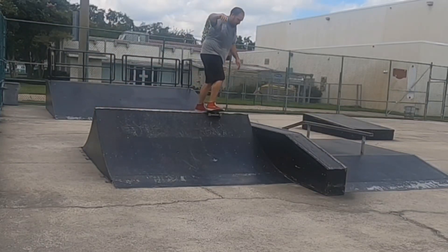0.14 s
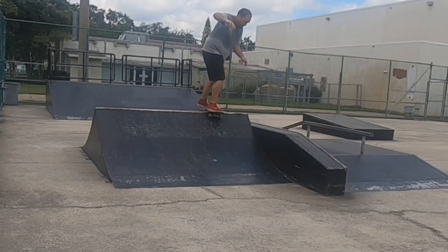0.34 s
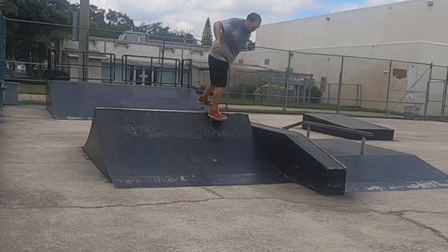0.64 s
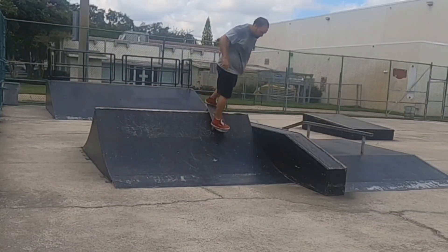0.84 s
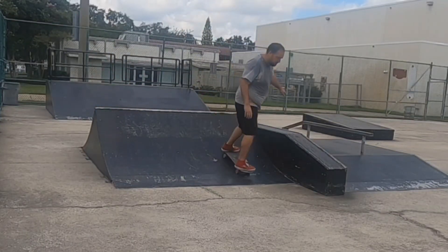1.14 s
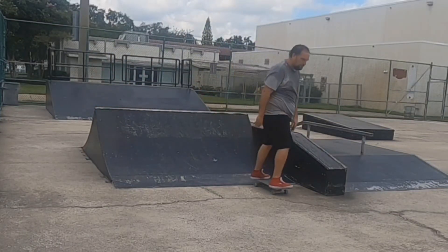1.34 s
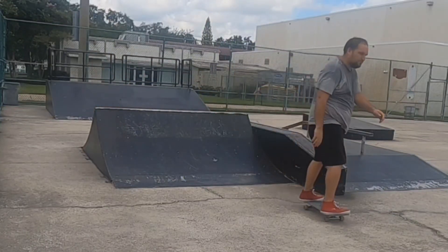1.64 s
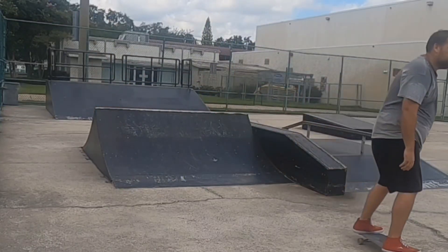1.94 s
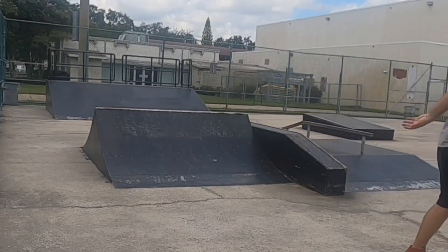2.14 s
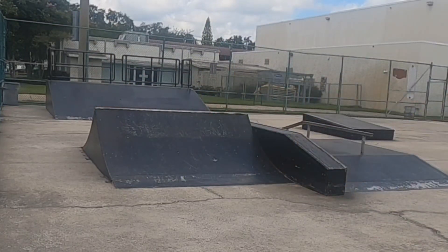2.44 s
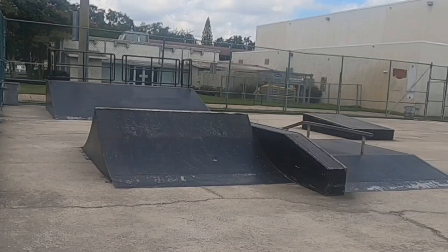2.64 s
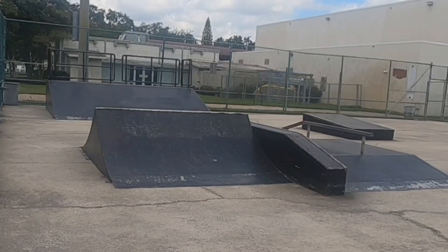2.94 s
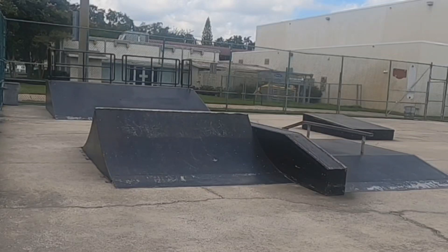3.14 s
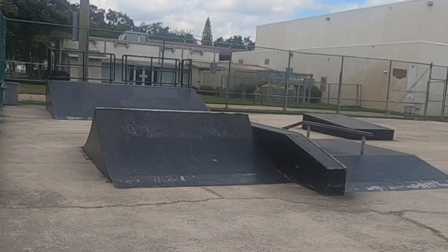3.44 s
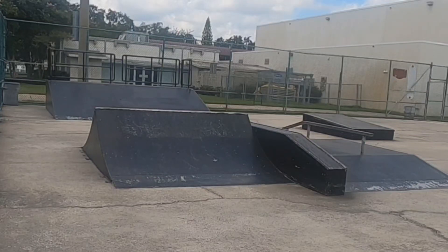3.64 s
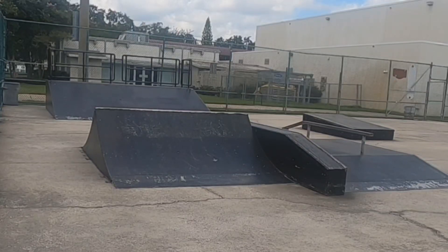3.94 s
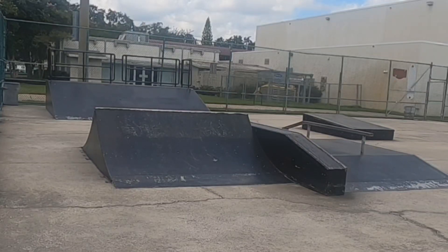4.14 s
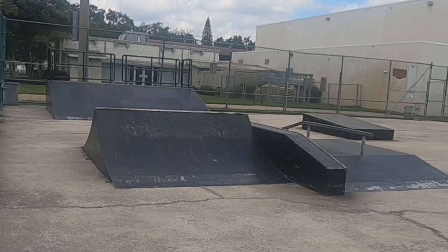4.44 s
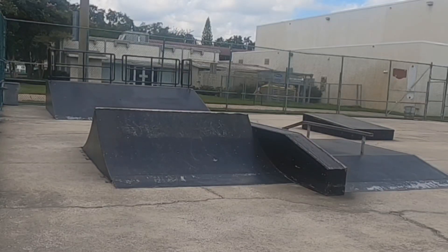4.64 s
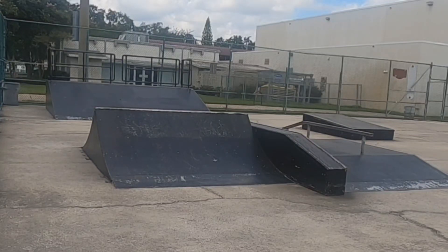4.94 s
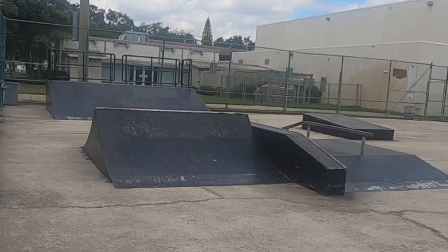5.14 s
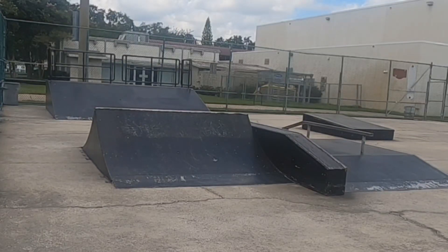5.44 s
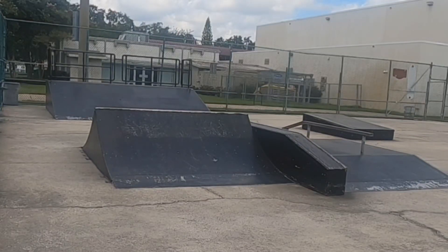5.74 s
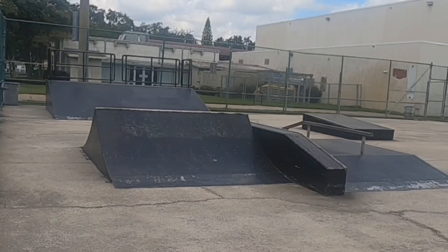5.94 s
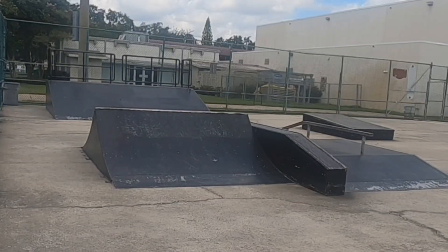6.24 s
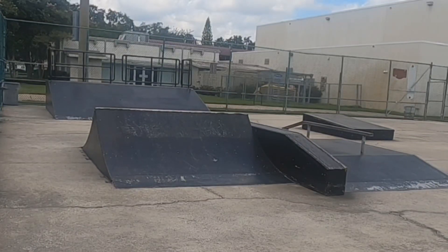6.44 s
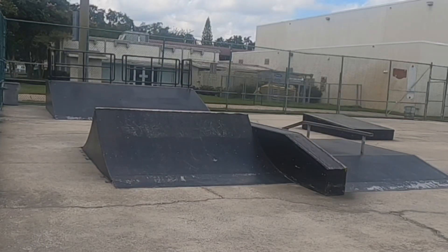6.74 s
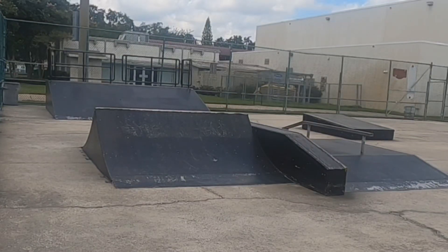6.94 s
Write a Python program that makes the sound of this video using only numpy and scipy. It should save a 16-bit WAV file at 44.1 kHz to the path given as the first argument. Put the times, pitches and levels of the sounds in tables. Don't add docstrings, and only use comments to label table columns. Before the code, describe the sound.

A small camera microphone outdoors catches a steady low hum of fan, motor and rushing air. Over it come brief wood knocks, then a burst of metallic clacks as a skateboard rolls down a ramp, a hollow gritty rumble approaching, scraping wheels, and two heavy deck blows at its closest. It leaves quickly with fading clicks; the wavering hum remains, with a very thin, high insect buzz.

```python
import sys
import numpy as np
from scipy import signal
from scipy.fft import rfft, irfft, next_fast_len
from scipy.io import wavfile
from scipy.ndimage import uniform_filter1d

SR = 44100
rng = np.random.default_rng(int(sys.argv[2]) if len(sys.argv) > 2 else 0)


def gain_from_db(level_db):
    decades = np.asarray(level_db, float) / 20
    return 10 ** decades


def generate_wav(signal):
    frames = np.transpose(np.atleast_2d(signal))
    scaled = np.clip(frames, -1, 1) * 32767
    pcm = np.round(scaled).astype(np.int16)
    wavfile.write(sys.argv[1], SR, pcm)


N = 313551
TIME = np.arange(N) / SR
SIZE = next_fast_len(N)
SHORT = np.arange(4096) / SR


def curves(table):
    s, *columns = np.transpose(table)
    return [np.interp(TIME, s, c) for c in columns]


def plateaus(events, attack_s, release_s=None):
    total = 0
    for s, db, hold, back in events:
        total = total + np.interp(TIME - s, np.cumsum([0, attack_s, hold, back]), [0, db, db, 0])
    return total


def unit(x):
    return x / np.sqrt(np.mean(x ** 2))


def peak(x):
    return x / np.max(abs(x), axis=1, keepdims=True)


def walk(rate):
    k = int(SR / rate)
    steps = np.repeat(rng.standard_normal(N // k + 1), k)
    return 1.14 * uniform_filter1d(uniform_filter1d(steps, k), k)[:N]


def ring(x, hz, width):
    return signal.lfilter(*signal.iirpeak(hz, hz / width, fs=SR), x)


def band(x, lo_hz, hi_hz, order=2):
    edges = [lo_hz, min(hi_hz, .45 * SR)]
    return signal.sosfilt(signal.butter(order, edges, "band", fs=SR, output="sos"), x)


def grains(rate, spread_db, count=N):
    on = rng.random(count) < rate / SR
    return on * gain_from_db(spread_db * rng.exponential(size=count)) * rng.standard_normal((2, count))


# (time [s], length [s], extra grit level [dB])
SCRAPES = [(1.062, 0.018, 1), (1.112, .035, 4), (1.29, 0.087, 5), (1.395, 0.036, 5), (1.77, 0.04, 4.5),
           (1.94, 0.085, 3.5), (2.297, 0.068, 2.5), (2.442, 0.1, 4.5)]


def scraping():
    edge_s = 0.0046
    return plateaus([(s, db, length, edge_s) for s, length, db in SCRAPES], edge_s)


# (time [s], nearness level [dB], level of wheels facing the camera [dB])
ROLL = [
    (0.9, -22, -4),
    (1.24, -6.5, -6.5),
    (1.64, -7, -5.5),
    (2.0, -4, -2.5),
    (2.5, -1.5, 1),
    (2.62, 3, -1),
    (2.78, -0.5, -12),
    (2.95, -4.5, -10.5),
    (3.1, -19, -8),
]
# (frequency [Hz], width [Hz], level [dB])
DECK = [(168, 115, -2.5), (218.5, 76, 1.5), (327, 15, 0), (404, 65, -6.5), (526, 154, -4), (593, 172, -5.5)]


def wheels():
    near_db, facing_db = curves(ROLL)
    rolling = np.interp(TIME, [.8, 1.25, 3.2, 3.5], [0, 1, 1, 0])
    patches_db = walk(29.94)

    bumps = band(grains(800, 0.76), 215, 1250, order=4)
    deck = 0
    for k, (hz, width, db) in enumerate(DECK):
        deck = deck + (-1) ** k * gain_from_db(db) * ring(bumps, hz, width)
    growl = ring(bumps, 727, 140) + 0.58 * ring(bumps, 1033, 170)
    slab = band(grains(300, 3.4), 63, 127)
    sand = grains(3500, 0.68)
    grit = band(sand, 2300, 5400) + 0.051 * band(sand, 5000, 7800, order=3)
    hiss = band(sand, 8900, 11600)

    deck_db = -27.5 + near_db + 0.7 * walk(25)
    growl_db = -36 + 0.86 * near_db - 0.37 * facing_db
    slab_db = -37.5 + 2.4 * near_db
    grit_db = -47.5 + 0.42 * near_db + facing_db + scraping() + 1.4 * patches_db
    hiss_db = -57.5 + 0.43 * near_db + 1.03 * facing_db + 0.65 * patches_db + 1.5 * walk(24.6)
    layers = ((deck, deck_db), (growl, growl_db), (slab, slab_db), (grit, grit_db), (hiss, hiss_db))
    return rolling * sum(unit(x) * gain_from_db(db) for x, db in layers)


def rattle(t60, hold, strike=0.):
    rise = 1 - np.exp(-SHORT / 0.00034)
    fade = gain_from_db(-60 * np.maximum(SHORT - hold, 0) / max(t60, .006))
    first = strike * np.exp(-((SHORT - .0004) / .0001) ** 2)
    return grains(12000, 3.3, count=len(SHORT)) * rise * fade + first


def place(blows):
    out = np.zeros((2, N + len(SHORT)))
    for s, db, x in blows:
        at = int(s * SR)
        out[:, at:at + x.shape[1]] += peak(x) * gain_from_db(db)
    return out[:, :N]


# (time [s], peak level [dB], ring frequency [Hz])
KNOCKS = [(0.0095, -14.5, 1240), (0.009, -27, 660), (0.192, -26, 1250), (0.203, -21, 1390),
          (0.2051, -18, 2030), (0.2055, -18, 820), (0.225, -21.5, 1240), (1.055, -12, 1310),
          (1.056, -14, 577), (1.104, -25, 550), (1.104, -26.5, 1000), (1.208, -14, 1120),
          (1.213, -16.5, 1390), (1.439, -22, 650), (1.44, -27, 930), (1.5415, -22, 1120), (1.546, -20, 980),
          (2.539, -19.5, 1020), (2.578, -13.5, 530), (2.679, -7.5, 650), (2.679, -15, 865),
          (2.763, -15, 891), (2.767, -17, 608), (3.072, -27.5, 1280), (3.171, -22, 1350), (3.171, -25, 770),
          (3.28, -24.5, 580), (3.28, -27.5, 1340), (3.39, -28, 834)]


def knock(hz):
    wood = band(rattle(0.031, 0.0035, strike=1.4), 0.11 * hz, 2 * hz)
    return ring(ring(wood, hz, 0.24 * hz), hz, 0.92 * hz)


def knocks():
    return place((s, db, knock(hz)) for s, db, hz in KNOCKS)


# (time [s], peak level [dB], decay [s])
THUMPS = [
    (1.056, -25.5, 0.15),
    (1.212, -14, 0.045),
    (1.539, -18.5, 0.07),
    (2.578, -11, 0.14),
    (2.676, -8, 0.14),
    (2.722, -30, 0.12),
    (2.764, -7, 0.15),
    (2.811, -15.5, 0.095),
    (2.85, -20, 0.077),
]


def boom(hz, t60):
    phase = 2 * np.pi * np.cumsum(140 + (hz - 140) * np.exp(-SHORT / 0.0121)) / SR
    swing = np.sin(phase) * (1 - np.exp(-SHORT / 0.0041)) * gain_from_db(-60 * SHORT / t60)
    push = band(rattle(t60, 0.0041), 70, 435)
    modes = sum(ring(push, f, 0.93 * width) for f, width, _ in DECK)
    return swing + 1.04 * modes / np.max(abs(modes))


def thumps():
    return place((s, db, boom(458, t60)) for s, db, t60 in THUMPS)


def clank(hz, treble_db, top_db, t60):
    shudder = rattle(t60, 0.047 * t60, strike=1.04)
    quicker = shudder * np.exp(-SHORT / 0.017)
    metal = band(shudder, 1700, 4700, order=3)
    treble = band(quicker, 4500, 7000, order=3)
    top = band(quicker, 8800, 13000, order=3)
    body = peak(ring(metal, hz, 0.5 * hz) + 0.12 * metal)
    return body + gain_from_db(treble_db) * peak(treble) + gain_from_db(top_db) * peak(top)


CLACK_T60_S = 0.039
# (time [s], peak level [dB], centre frequency [Hz], treble level [dB])
CLACKS = [(0.0094, -33, 2200, -14), (0.205, -29.5, 2070, -12.5), (0.224, -29, 2300, -15),
          (1.052, -26, 2400, -5), (1.0548, -11.5, 2240, -32), (1.1045, -22.5, 2300, -12),
          (1.2074, -29, 2020, -11), (1.213, -13.5, 2830, -14.5), (1.3614, -9.5, 2600, -17),
          (1.4393, -11, 2450, -16), (1.443, -19, 2700, -12), (1.5407, -13.5, 2700, -13.5),
          (2.5385, -21, 2400, -12), (2.5825, -24.5, 2200, -16), (2.6755, -9.5, 2800, -1.5),
          (2.7631, -14.5, 2640, -0.5), (2.791, -25, 2200, -3), (3.1696, -20, 2300, -17),
          (3.2784, -29, 2200, -30), (3.39, -29, 2200, -38)]


def clacks():
    blows = []
    for s, db, hz, treble_db in CLACKS:
        t60 = CLACK_T60_S + .04 * gain_from_db(treble_db)
        blows.append((s, db, clank(hz, treble_db, -21.5 + 0.39 * treble_db, t60)))
    return place(blows)


# (time [s], peak level [dB])
PEBBLES = [(1.4, -28), (1.6895, -29), (2.028, -28), (2.0594, -36), (2.3236, -30), (2.395, -27),
           (2.4776, -27)]


def pebbles():
    return place((s, db, clank(2800, -23, -41, CLACK_T60_S)) for s, db in PEBBLES)


# (time [s], peak level [dB])
TICKS = [(0.06, -44), (0.8589, -33), (3.072, -36), (3.092, -42), (3.112, -44), (3.1347, -35), (3.152, -44)]


def ticks():
    return place((s, db, clank(2240, -7.5, -9, CLACK_T60_S)) for s, db in TICKS)


# (time [s], depth [dB], hold [s], recovery [s])
DUCKS = [
    (-0.02, -3, 0.15, 0.81),
    (1.02, -2.5, 0.68, 0.2),
    (2.683, -5.5, .45, .95),
]


def ducking():
    return plateaus(DUCKS, attack_s=0.051)


def tone(phase, wobble_db, rate):
    level = gain_from_db(wobble_db * walk(rate))
    return np.sqrt(2) * level * np.sin(phase + 0.54 * wobble_db * walk(rate))


# (frequency [Hz], level [dB per Hz])
AIR = [(20, -11.5), (80, -6.5), (125, -6), (200, -12), (310, -11), (420, -15), (640, -20.5), (950, -14.5),
       (1700, -25), (2200, -23), (3300, -27.5), (4600, -43), (8500, -60), (15000, -70)]


def rushing_air(bass_db, body_db, upper_db):
    freq = np.fft.rfftfreq(SIZE, 1 / SR) + 1
    hz, db = np.transpose(AIR)
    white = rfft(rng.standard_normal((2, SIZE))) * gain_from_db(np.interp(np.log(freq), np.log(hz), db))
    scale = gain_from_db(-32) / np.std(irfft(white, SIZE))
    air = 0
    for octave in np.arange(-6, 5.):
        share = np.clip(1 - abs(np.log2(freq / 1000) - octave), 0, 1)
        gain_db = bass_db if octave < -2.7 else body_db if octave < 0 else upper_db
        air = air + scale * irfft(white * share, SIZE)[:, :N] * gain_from_db(gain_db + 0.65 * walk(9))
    return air


# (frequency [Hz], level [dB])
MOTOR = [(323.0, -49.5), (439.8, -47.5), (732.1, -57.5), (855.9, -52), (909.8, -56.5), (963.6, -49),
         (1174, -55), (1389, -60.5), (1497, -55), (1707, -60.5), (2196, -54)]


def motor(bass_db, upper_db):
    shaft_hz, shaft_db = 107.2, -44.5
    lines = sum(gain_from_db(db + upper_db) * tone(2 * np.pi * hz * TIME, 2.89, 20) for hz, db in MOTOR)
    for k in range(2):
        turn = 2 * np.pi * (k + 1) * shaft_hz * TIME
        lines = lines + gain_from_db(shaft_db - 1.06 * k + bass_db) * tone(turn, 1.5, 14)
    return lines


# (time [s], level [dB], overtone level under it [dB])
FAN = [(0.0, -38, -4), (0.55, -30.5, -10), (0.77, -36.5, -4), (1.0, -29.5, -16.5), (1.29, -36, -22),
       (1.6, -32.5, -12.5), (2.2, -31.5, -5.5), (2.65, -39, -2), (3.0, -43, -4), (3.9, -44.5, -13),
       (4.2, -36, -4.5), (5.0, -35, -3), (5.65, -31.5, -5), (5.96, -29.5, -11.5), (6.3, -33.5, -9),
       (6.55, -28, -24), (6.7, -33.5, -10), (6.9, -27.5, -16)]


def fan():
    first_db, second_db = curves(FAN)
    turn = 2 * np.pi * 146.55 * TIME
    first = gain_from_db(first_db) * tone(turn, 1.0, 16)
    return first + gain_from_db(first_db + second_db) * tone(2 * turn, 0.52, 6.1)


def leaves(upper_db):
    rustle = band(rng.standard_normal((2, N)), 9500, 12200)
    return gain_from_db(-78.5 + 0.25 * upper_db) * unit(rustle)


def plant():
    upper_db = ducking()
    bass_db, body_db = 1.26 * upper_db, 0.96 * upper_db
    return rushing_air(bass_db, body_db, upper_db) + motor(bass_db, upper_db) + fan() + leaves(upper_db)


def singer(hz, width):
    lowpass = signal.butter(3, width / 2, fs=SR, output="sos")
    slow = signal.sosfilt(lowpass, rng.standard_normal((2, 2, N)))
    phase = 2 * np.pi * np.cumsum(hz) / SR
    return unit(slow[0] * np.cos(phase) + slow[1] * np.sin(phase))


# (time [s], low singer level [dB], high singer level [dB])
BUZZ = [(3.2, -82, -96), (3.6, -78, -94), (4.1, -73, -90), (5.3, -71, -91), (7.1, -70.5, -89)]
# (time [s], low singer frequency [Hz], high singer frequency [Hz])
DRIFT = [(3.4, 10080, 13900), (5, 10260, 13760), (7.1, 10360, 13660)]


def insects():
    low_db, high_db = curves(BUZZ)
    low_hz, high_hz = curves(DRIFT)
    throb = unit(np.exp(.8 * np.cos(2 * np.pi * 72.5 * TIME)))
    low = singer(low_hz, 380) * throb * gain_from_db(low_db)
    high = singer(high_hz, 330) * gain_from_db(high_db + 3)
    return np.interp(TIME, [2.9, 3.25], [.1, 1]) * (low + high)


def scene():
    board = wheels() + knocks() + thumps() + clacks() + pebbles() + ticks()
    return board + plant() + insects()


def limiter(dry):
    level, lag_s = 0.51, 0.03
    keep = np.exp(-1 / (lag_s * SR))
    loud = signal.lfilter([1 - keep], [1, -keep], dry[0] ** 2)
    return dry / np.sqrt(1 + 2 * loud / level ** 2)


# (frequency [Hz], level [dB], phase lead [rad], likeness [0-1])
PORTS = [(60, -24, .2, .4), (108, -24, .4, .45), (120, -15, 1.3, .7), (135, -6, 1.5, .97),
         (200, -2.5, 1.52, 1.), (350, 1.2, 1.53, 1.), (700, 3.1, 1.55, .99), (1300, 1.4, 1.65, .98),
         (1900, 2.1, 1.7, .96), (2800, .6, 1.05, .95), (4500, -2.5, 1.6, .88), (6500, -5, 2.3, .7),
         (8000, -8.5, 3, .4), (9200, -1, 3.1, .5), (10200, 4, 1.2, .6), (11200, 9, 3.1, .4),
         (12800, 7, 3.1, .4), (13700, 2, .6, .5)]


def two_ports(x):
    freq = np.fft.rfftfreq(SIZE, 1 / SR) + 1
    hz, *columns = np.transpose(PORTS)
    db, lead, like = (np.interp(np.log(freq), np.log(hz), c) for c in columns)
    like = np.clip(like, 0, 1)
    left, other = rfft(x, SIZE)
    right = gain_from_db(db) * np.exp(1j * lead) * (like * left + np.sqrt(1 - like ** 2) * other)
    both = np.sqrt(1 + gain_from_db(2 * db) + 2 * like * gain_from_db(db) * np.cos(lead)) / 2
    return irfft(np.array([left, right]) / both, SIZE)[:, :N]


def thin(x):
    hz, _, z = signal.stft(x, SR, nperseg=1024)
    patch = 10 * np.log10(uniform_filter1d(abs(z) ** 2, size=6, axis=1) + 1e-18)
    top = patch[:, (hz > 10800) & (hz < 13000)]
    loud = top.mean(axis=(0, 1))
    louder = loud - np.median(loud)
    low_insect = patch[:, (hz > 10100) & (hz < 10500)].mean(axis=(0, 1))
    thin_tone = uniform_filter1d(low_insect - loud, size=30)

    slope = (-2.6 * np.clip(hz / 1000 - 12, 0, 2) + 3.5 * (hz > 14150))[:, None]
    gap = (9.5 + .22 * np.maximum(louder, 0)) * (abs(hz - 9280) < 300)[:, None]
    mask = 1.7 * (abs(hz - 12150) < 1250)[:, None] * np.maximum(thin_tone - 9.2, 0)
    whim = rng.standard_normal((len(hz) // 10 + 1, len(loud) // 4 + 1))
    whim = 3 * np.kron(whim, np.ones((10, 4)))[:len(hz), :len(loud)]
    limit = np.median(top) - 5 + slope + gap + mask + whim + .6 * louder
    dropped = (patch < limit) & (hz > 7800)[:, None]
    return signal.istft(z * ~dropped, SR, nperseg=1024)[1][:, :N]


def top_cut(x):
    return signal.sosfilt(signal.butter(12, 15110, fs=SR, output="sos"), x)


def record(dry):
    pair = np.tanh(two_ports(limiter(dry)))
    return top_cut(thin(pair))


dry = scene()
out = record(dry)
generate_wav(out)
```